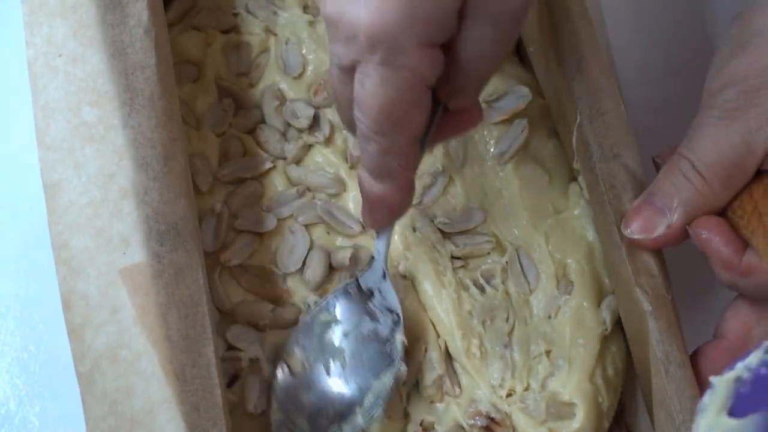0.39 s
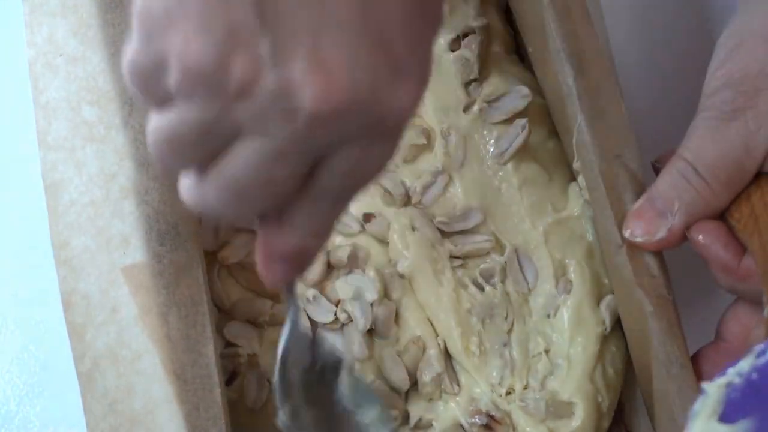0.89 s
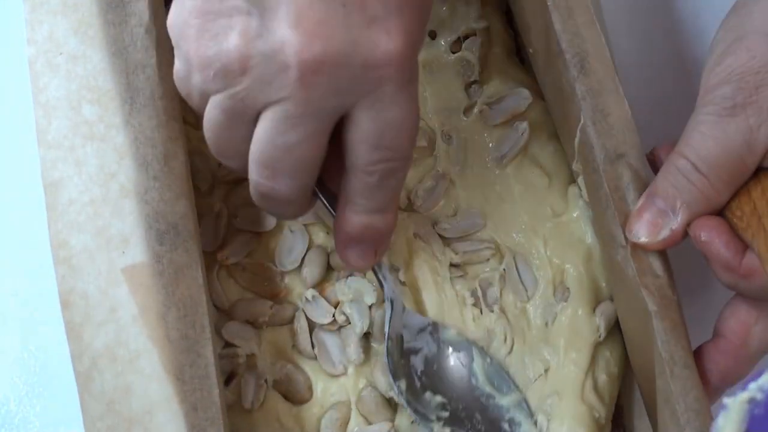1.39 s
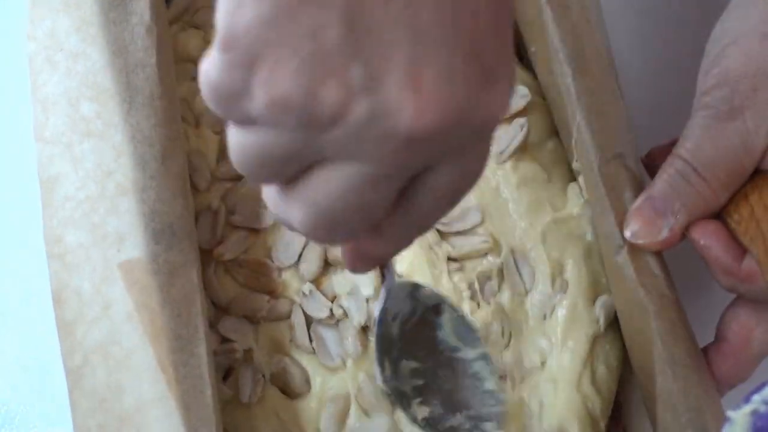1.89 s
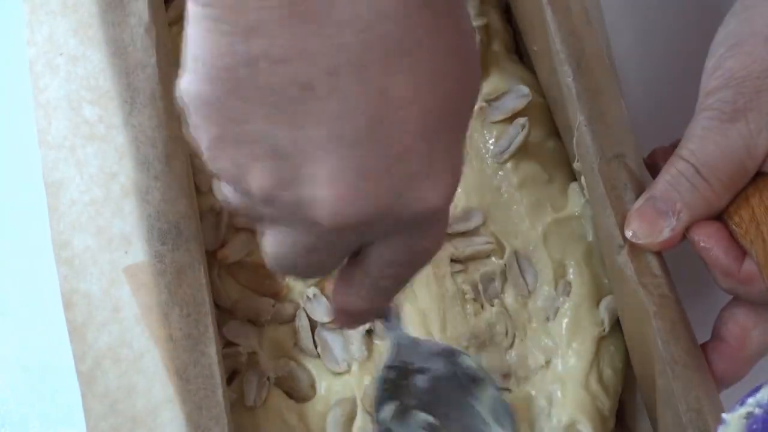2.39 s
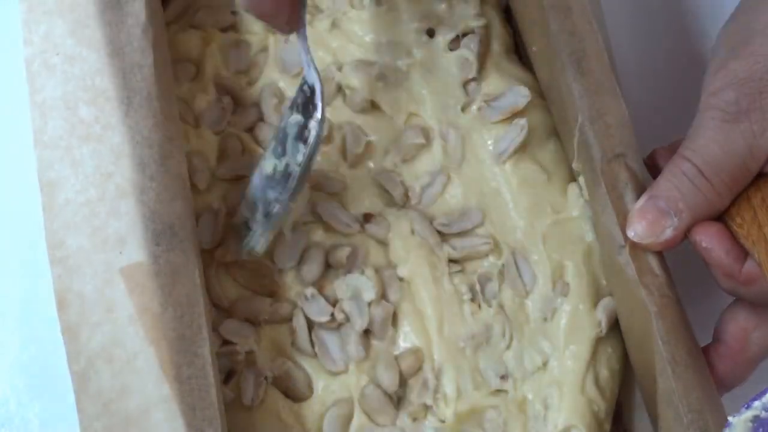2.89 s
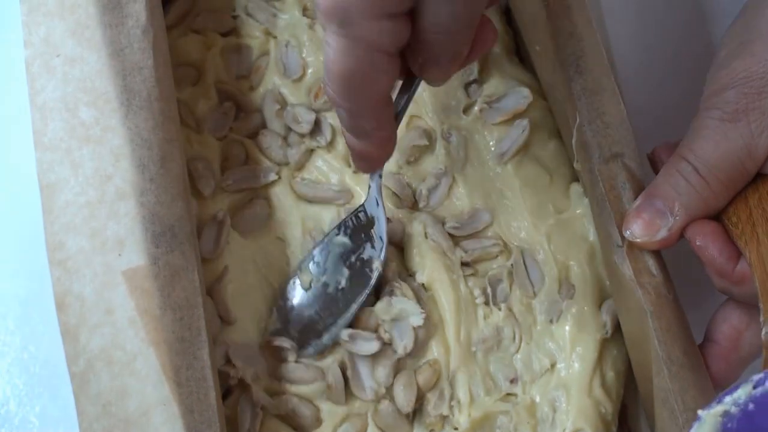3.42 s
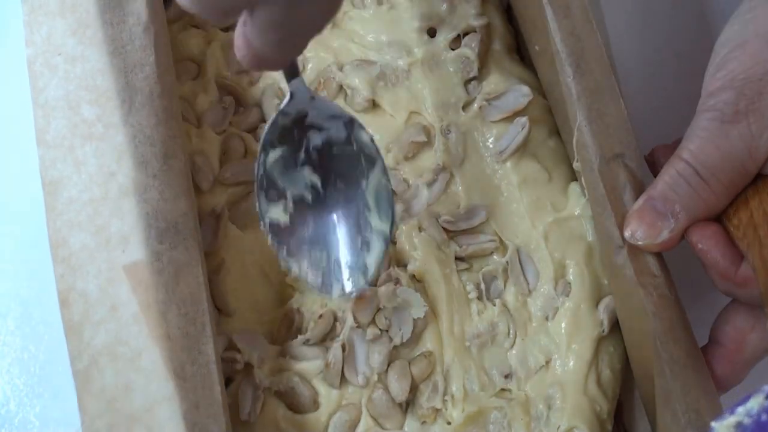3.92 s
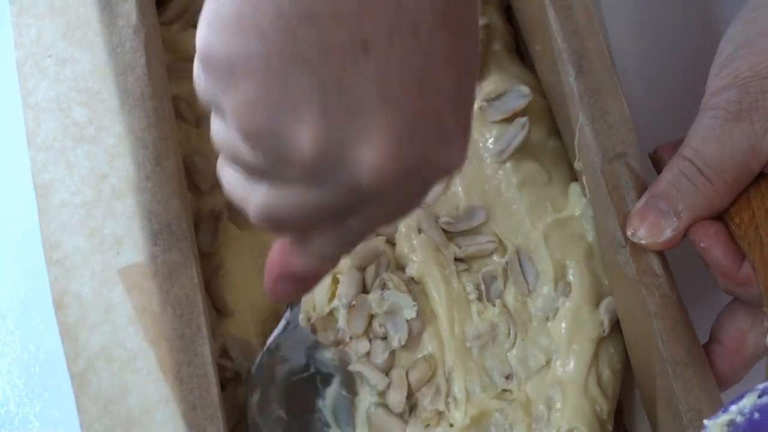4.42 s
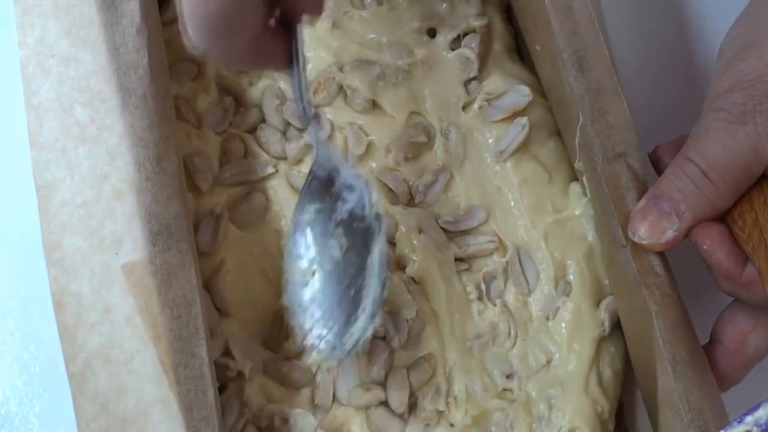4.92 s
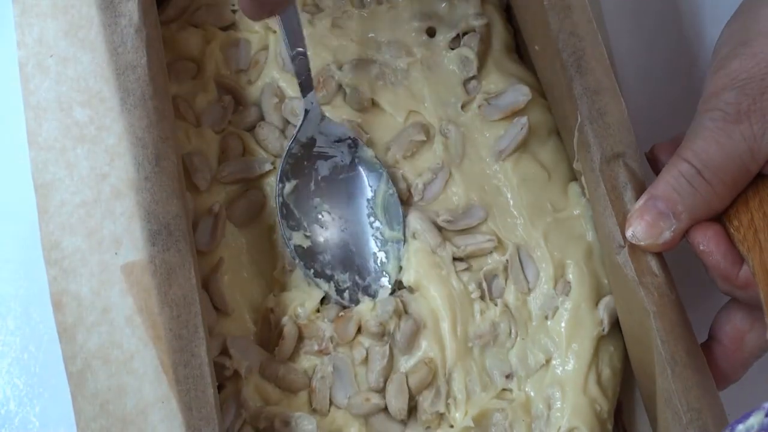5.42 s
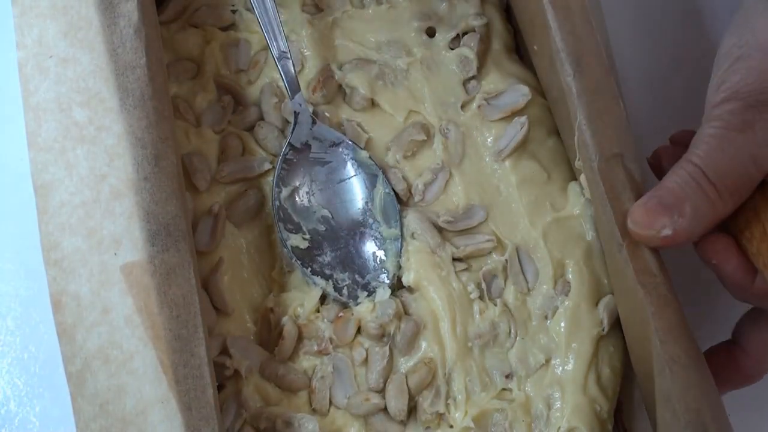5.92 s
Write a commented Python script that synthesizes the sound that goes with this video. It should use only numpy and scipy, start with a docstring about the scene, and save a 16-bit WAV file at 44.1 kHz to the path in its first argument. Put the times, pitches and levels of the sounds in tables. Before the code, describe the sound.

Stiff paper crackles and rasps in uneven bursts as a spoon presses a sticky mass in a box, with soft thuds and one late clink.

```python
"""A metal spoon presses a sticky nut mixture into a paper-lined box on a kitchen counter, close to two microphones.
The paper snaps as creases give (swarms of tiny cracks) and hisses as it drags along the box (dense slip grains).
The sticky mass pops softly (random short bursts); the box knocks on the counter and the spoon clinks once
on the rim (struck modes). A hard-walled kitchen rings on (decaying noise) over a faint, wavering room noise."""
import sys
import numpy as np
from scipy import signal
from scipy.io import wavfile

SR = 44100
rng = np.random.default_rng(int(sys.argv[2]) if len(sys.argv) > 2 else 0)


def wrap_up_sound(samples):
    """Save the sound to the file named by the first command line argument, as 16-bit audio."""
    columns = np.atleast_2d(samples).T
    # keep every value between -1 and 1, then stretch to whole-number steps
    tamed = np.clip(columns, -1, 1)
    steps = np.round(tamed * 32767).astype(np.int16)
    wavfile.write(sys.argv[1], SR, steps)


def gain_from_db(level_db):
    """Convert decibel levels to linear amplitude factors (20 dB per decade)."""
    decades = np.asarray(level_db, float) / 20
    return 10 ** decades


N = 266838  # samples


def rms_one(x):
    """Scale to rms 1."""
    return x / np.sqrt(np.mean(x ** 2) + 1e-20)


def at_hz(points, hz):
    """Read a table of (Hz, value) on a log-frequency axis."""
    points_hz, values = np.transpose(points)
    return np.interp(np.log(hz), np.log(points_hz), values)


def drift(rate_hz):
    """Slow chance movement with rms 1: white noise through two equal one-pole low-passes."""
    r = np.exp(-2 * np.pi * rate_hz / SR)
    slow = signal.lfilter([1], [1, -2 * r, r * r], rng.standard_normal(N + SR))
    return rms_one(slow[SR:])  # the first second lets the filter settle


def resonance(x, hz, width_hz):
    """Two-pole peak of gain 1."""
    r = np.exp(-np.pi * width_hz / SR)
    zeros = np.array([1, 0, -1]) * (1 - r * r) / 2
    poles = [1, -2 * r * np.cos(2 * np.pi * hz / SR), r * r]
    return signal.lfilter(zeros, poles, x)


def hollow(x):
    """The open box colours what sounds inside it with its air resonances and holds back treble and bass."""
    # air resonances of the open box: [f/Hz, width/Hz, level/dB]
    air_modes = [(900, 750, -4), (1212, 117, 5), (1457, 695, -2.5)]
    air = 0
    for k, (hz, width_hz, db) in enumerate(air_modes):
        air = air + (-1) ** k * gain_from_db(db) * resonance(x, hz, width_hz)  # neighbours in opposite phase
    return signal.sosfilt(signal.butter(2, [600, 3500], "band", fs=SR, output="sos"), air)


def bank(x, gain):
    """Half-octave bands, each times gain(centre Hz); x holds unrelated signals, the first two dealt in turn."""
    band_edges_hz = 35 * 2 ** np.arange(0, 9.1, .5)
    out = 0
    for k, (low, high) in enumerate(zip(band_edges_hz, band_edges_hz[1:])):
        bandpass = signal.butter(2, [low, high], "band", fs=SR, output="sos")
        out = out + signal.sosfilt(bandpass, x[k % 2]) * gain(np.sqrt(low * high))
    return out


def sides(hz):
    """Gains of mid and side for diffuse sound."""
    # side against mid in diffuse sound: [f/Hz, level/dB]
    side_level = [(60, -29), (250, -7), (1000, -7.5), (4000, -9.5), (10000, -7.5)]
    return np.array([[1], [gain_from_db(at_hz(side_level, hz))]])


def left_right(mid_side):
    """Mid and side to two channels."""
    return mid_side[0] + mid_side[1] * np.array([[1], [-1]])


def strike(hits, modes, spread_db, soft_hz):
    """Each hit rings all modes, with strengths of its own; a soft contact is a low-passed click."""
    out = np.zeros(N)
    luck = rng.normal(0, 1, (len(hits), len(modes)))
    at = [round(s * SR) for s, db in hits]
    hit_db = np.array(hits)[:, 1]
    for k, (hz, level_db, t60) in enumerate(modes):
        clicks = np.full(N, 1e-18)
        clicks[at] = gain_from_db(hit_db + level_db + spread_db * luck[:, k])
        r = gain_from_db(-60 / (t60 * SR))  # decay per sample
        w = 2 * np.pi * hz / SR
        out += signal.lfilter([0, np.sin(w)], [1, -2 * r * np.cos(w), r * r], clicks)
    return signal.sosfilt(signal.butter(2, min(soft_hz, 20000), fs=SR, output="sos"), out)


def strokes():
    """Each stroke sets in fast, presses harder until its end and lifts off; gains of paper hiss and box part."""
    # spoon strokes that drag the paper: [start/s, end/s, level at the end/dB, hollow box part against paper/dB]
    presses = [(0.0, 0.14, -54.5, -1), (0.42, 0.6, -69, -38), (0.815, 0.924, -61, -6.5),
               (1.185, 1.925, -50, -4), (2.27, 2.36, -57, -9), (2.435, 2.56, -66.5, -3),
               (3.12, 3.262, -57, -4.5), (3.365, 3.859, -53.5, -3.5), (4.206, 4.34, -60, -1),
               (4.566, 4.742, -53.5, -1.5), (5.11, 5.4, -60, -2), (5.817, 6.048, -68, 3)]
    build_db_per_s, set_down_db_per_s, lift_db_per_s = 28.5, 319, 150
    t = np.arange(N) / SR
    paper, box = gain_from_db(-101.5), 0  # negligible floor keeps the gain above zero: practically silent between strokes
    for start, end, db, box_db in presses:
        build = build_db_per_s * np.maximum(end - t, 0)
        set_down = set_down_db_per_s * np.maximum(start - t, 0)
        lift = lift_db_per_s * np.maximum(t - end, 0)
        press = gain_from_db(db - build - set_down - lift)
        paper = paper + press
        box = box + press * gain_from_db(box_db)
    return paper, box


def drag():
    """Paper fibres stick and slip on the box wall: dense grains, swelling with every stroke and tug."""
    # short tugs on the paper: [peak t/s, level/dB, rise/ms]
    tugs = [(0.445, -46, 9.5), (1.888, -42.5, 48), (1.953, -31.5, 7.9), (1.974, -31.5, 10.3),
            (2.515, -42.5, 44), (2.565, -37.5, 16.6), (2.58, -30, 7), (3.883, -42, 14.2),
            (4.596, -45.5, 31.5), (4.663, -41.5, 55), (4.79, -37.5, 43), (4.805, -27.5, 5.2),
            (5.377, -46.5, 15), (5.891, -52.5, 6.3)]
    # hiss of dragged paper: [f/Hz, level per Hz/dB]
    paper_colour = [(180, -8), (300, -4.5), (885, -3), (1500, -10.5), (2200, 0.5), (6400, 0.5), (9000, 2),
                    (12000, -11), (16000, -7.5)]
    fall_share, tug_box_db = 0.46, -7  # fall time against rise time; hollow box part against paper
    slips_per_s, spiky_db, clump_db, clump_hz = 14000, 2.5, 2.5, 45
    t = np.arange(N) / SR
    paper, box = strokes()
    for peak_s, tug_db, rise_ms in tugs:
        ms = 1000 * (t - peak_s)
        share = np.where(ms < 0, 1, fall_share)
        swell = gain_from_db(tug_db) * np.exp(-(ms / max(rise_ms, .5) / share) ** 2)
        paper = paper + swell
        box = box + swell * gain_from_db(tug_box_db)
    sizes = gain_from_db(spiky_db * np.minimum(rng.exponential(1, (3, N)), 4))
    slips = (rng.random((3, N)) < slips_per_s / SR) * rng.standard_normal((3, N)) * sizes
    slips = slips * gain_from_db(clump_db * drift(clump_hz))  # the grains come in uneven clumps
    hiss = rms_one(bank(slips, lambda hz: gain_from_db(at_hz(paper_colour, hz))))
    return paper * hiss + box * rms_one(hollow(slips[2]))


def smacks():
    """The sticky mass lets go of spoon and paper in tiny random pops, louder while the paper is worked."""
    pops_per_s, pop_ms, spread_db = 70, 3.0, 5
    effort = gain_from_db(-67.0) * strokes()[0] / gain_from_db(-58)  # -67 dB where the stroke gain is -58 dB
    sizes = gain_from_db(spread_db * np.minimum(rng.exponential(1, N), 3))
    pops = (rng.random(N) < pops_per_s / SR) * effort * sizes
    fading = signal.lfilter([1], [1, -np.exp(-1000 / (pop_ms * SR))], pops)
    swarm = fading * rng.standard_normal(N)
    return hollow(swarm) + gain_from_db(3.0) * resonance(swarm, 7400, 6000)


def room_noise():
    """Faint rumble and hiss of the kitchen: banded noise wavering a little, with one flickering narrow band."""
    # colour of the room noise: [f/Hz, level per Hz/dB]
    room_colour = [(24, -25), (40, 5), (112, 9), (337, -1), (646, -2), (1270, -2), (1850, -8.5),
                   (7360, -14), (13100, -19.5), (14800, -14), (16000, -28)]
    noise = bank(rng.standard_normal((2, 2, N)), lambda hz: sides(hz) * gain_from_db(at_hz(room_colour, hz)))
    band = rms_one(resonance(rng.standard_normal(N), 1295, 160))  # centre Hz, width Hz
    steady = left_right(rms_one(noise) * np.sqrt(.5))
    wavering = gain_from_db(-65 + drift(7.2)) * steady
    flickering = gain_from_db(-77 + 4.5 * drift(12)) * band
    return wavering + flickering


def kitchen(x):
    """Diffuse reflections: noise that builds after a short gap and dies at each band's own rate."""
    # reverberation of the kitchen: [f/Hz, t60/s]
    ring_s = [(100, 0.33), (300, 0.63), (800, 0.42), (2100, 0.44), (5500, 0.36), (14600, 0.22)]
    gap_ms, build_ms = 1.6, 1.6
    t = np.arange(SR * 3 // 4) / SR
    noise = rng.standard_normal((2, 2, len(t)))
    tail = bank(noise, lambda hz: sides(hz) * gain_from_db(-60 * t / at_hz(ring_s, hz)))
    tail *= 1 - np.exp(-np.maximum(1000 * t - gap_ms, 0) / build_ms)
    tail = tail / np.sqrt(np.sum(tail[0] ** 2))  # mid energy 1
    return left_right(signal.fftconvolve(x[None], tail, axes=1)[:, :N])


def snaps():
    """A crease lets go as a sudden swarm of tiny cracks that thins out within milliseconds.
    Returns the sound heard directly and the sound sent to the walls: one filtered click of equal level each,
    so the tail rings smoothly."""
    # creases giving way: [t/s, level/dB, crisp centre f/Hz, hollow box part against crisp part/dB]
    creases = [(0.0103, -44.5, 3260, 1), (0.057, -45.5, 3730, -1.5), (0.1035, -26.5, 3480, -3),
               (0.146, -42.5, 3340, 9.5), (0.218, -45.5, 3040, 6), (0.2314, -40.5, 3280, -5),
               (0.2568, -37, 4970, 5), (0.2595, -31.5, 3920, -1), (0.2948, -29.5, 6700, 2),
               (0.2992, -30.5, 3560, -13), (0.311, -40, 7250, -19), (0.3202, -33.5, 6130, -35),
               (0.4698, -46.5, 5970, -31), (0.482, -41.5, 6070, -11.5), (0.521, -47, 6000, -9),
               (0.553, -54, 4970, -1.5), (0.6108, -50, 6240, -14), (0.6214, -41.5, 6140, -19),
               (0.74, -51.5, 9300, -30), (0.7656, -59, 4400, 0), (0.847, -59, 4000, 3),
               (0.9376, -38.5, 8000, -13.5), (1.143, -52, 3180, 4), (1.265, -38.5, 9600, -11),
               (1.2828, -39.5, 5800, -21), (1.3709, -48.5, 6040, 1), (1.416, -48.5, 3140, -4),
               (1.516, -42.5, 5650, -10), (1.5501, -41.5, 4640, -3), (1.605, -34, 4150, -11.5),
               (1.696, -39.5, 2930, -2), (1.729, -39, 3210, -5.5), (1.8166, -39, 6130, -4),
               (1.8425, -34, 7860, -16), (1.8804, -29, 4900, -15), (2.1698, -52.5, 2780, -2.5),
               (2.247, -49, 4470, -5), (2.2912, -44, 6980, -4), (2.332, -44.5, 5670, -1),
               (2.4257, -44, 11900, -27), (2.4392, -43, 6440, -3), (2.485, -39, 7300, -5),
               (2.752, -59.5, 4000, 5), (2.809, -61.5, 3260, 7), (2.972, -69.5, 2940, 15.5),
               (3.017, -45.5, 3760, -9), (3.1105, -47, 6000, -15), (3.1652, -47.5, 2800, 3.5),
               (3.236, -48, 4050, -12), (3.258, -48, 4550, -10), (3.3017, -35.5, 3700, -38),
               (3.3435, -42.5, 4890, -26), (3.4145, -41, 4900, -15), (3.4553, -27.5, 4200, -5),
               (3.6135, -47, 3300, 0.5), (3.708, -40.5, 5700, 1), (3.719, -38.5, 10000, -21),
               (3.7477, -37.5, 7040, -7), (4.1997, -54, 3300, -3), (4.2804, -39, 2980, -3.5),
               (4.374, -35, 3400, -2), (4.4827, -45.5, 6150, -5), (4.7275, -39, 7110, -6),
               (4.7587, -25.5, 6700, -31), (5.1574, -63.5, 3000, 20.5), (5.2074, -51, 7500, 4.5),
               (5.219, -42, 7560, 7.5), (5.254, -45.5, 2880, 2), (5.3687, -40, 5760, -31),
               (5.3877, -38.5, 6400, -14), (5.6297, -56.5, 3200, 6.5), (5.662, -43.5, 3070, -9),
               (5.6908, -25, 4300, -7.5), (5.836, -52.5, 3400, 1), (5.9008, -40.5, 5770, -10)]
    thin_ms, thin_spread = 4.37, 0.25  # typical decay time; its chance variation as a share
    crack_spread_db, broad_db, reach = 3.5, -9, 2.8  # reach: top of the band against the crisp centre
    size = 2048
    out = np.zeros((2, N + size))
    t = np.arange(size) / SR
    cracks = rng.standard_normal((len(creases), 2, size))
    sizes = gain_from_db(crack_spread_db * np.minimum(rng.exponential(1, (len(creases), size)), 4))
    lengths_ms = thin_ms * np.exp(thin_spread * rng.standard_normal(len(creases)))
    click = 1. * (t == 0)
    for (s, db, hz, box_db), (crack, echo), grain, ms in zip(creases, cracks, sizes, lengths_ms):
        shape = (1 - np.exp(-t / 0.0001)) * np.exp(-1000 * t / max(ms, .4))
        top_hz = min(reach * hz, 15000)  # big patches are duller
        band = signal.butter(2, [1900, top_hz], "band", fs=SR, output="sos")
        gain = gain_from_db(db) * np.sqrt(np.mean(shape ** 2))
        i = round(s * SR)
        for way, paper, air in ((0, crack * grain * shape, echo * shape), (1, click, click)):
            broad = signal.sosfilt(band, paper)
            crisp = resonance(broad, hz, 0.42 * hz) + gain_from_db(broad_db) * broad  # the freed patch rings at its size
            out[way, i:i + size] += gain * (rms_one(crisp) + gain_from_db(box_db) * rms_one(hollow(air)))
    return out[:, :N]


def knocks():
    """The counter is pushed down a moment after the paper peaks and the box bounces once;
    the wide counter reaches the two microphones with its modes mixed differently."""
    # box on counter: [paper peak t/s, level/dB]
    bumps = [(0.314, -58.5), (0.53, -62), (1.205, -52), (1.689, -58.5), (1.966, -32.5), (2.573, -36),
             (3.873, -55), (4.185, -55), (4.804, -49), (5.099, -57.5), (5.692, -50.5)]
    # modes of counter and box bottom: [f/Hz, level/dB, t60/s]
    counter_modes = [(55, -28, .1), (82, -19, .1), (120, -6, .11), (156, 0, .1), (150, -17, .4),
                     (161, -11, .45), (188, -5, .09), (240, -6, .06), (280, -15, .25), (365, -28, .15),
                     (480, -26, .08)]
    lag_ms, bounce_ms, bounce_db = 9.94, 26.0, -7
    first = [(s + lag_ms / 1000, db) for s, db in bumps]
    bounces = [(s + bounce_ms / 1000, db + bounce_db) for s, db in first]
    ears = [strike(first + bounces, counter_modes, spread_db=3.5, soft_hz=378) for ear in "LR"]
    return -np.array(ears)  # the first push is downward


def clink():
    """The spoon meets the rim once, hard, and its metal modes ring."""
    # spoon on rim: [t/s, level/dB]
    rim_hits = [(5.6905, -39.5)]
    # modes of spoon and rim: [f/Hz, level/dB, t60/s]
    spoon_modes = [(560, -8, .04), (598, 4, .13), (745, 1, .04), (1690, -7, .13), (1960, -9, .1),
                   (2428, -13, .1), (3386, -14, .08), (3860, -3, .015), (4630, -11, .12), (5760, -5, .015)]
    return strike(rim_hits, spoon_modes, spread_db=0, soft_hz=12000)


def scene():
    """Box close in front of the microphones, room around it."""
    thuds = knocks()
    direct, to_walls = snaps()
    near = drag() + smacks() + clink()
    walls = gain_from_db(-4.5) * kitchen(near + to_walls + gain_from_db(-7.5) * thuds[0])
    return near + direct + thuds + walls + room_noise()


def low_pass(x):
    """Removes everything above the highest recorded frequency."""
    return signal.sosfilt(signal.butter(12, 17000, fs=SR, output="sos"), x)


def record(dry):
    """Small microphones lose the deepest bass; the treble ends just below 16.75 kHz."""
    mix = signal.sosfilt(signal.butter(2, 48, "high", fs=SR, output="sos"), dry)
    mix = signal.sosfilt(signal.cheby2(10, 60, 16750, fs=SR, output="sos"), mix)
    return low_pass(mix)


dry = scene()
out = record(dry)
wrap_up_sound(out)
```